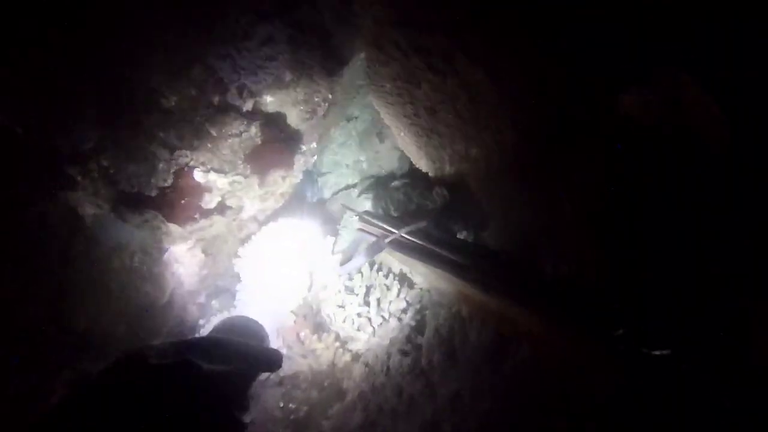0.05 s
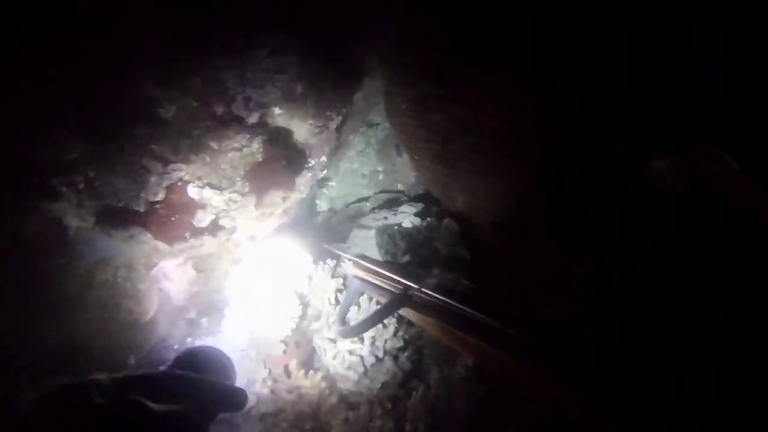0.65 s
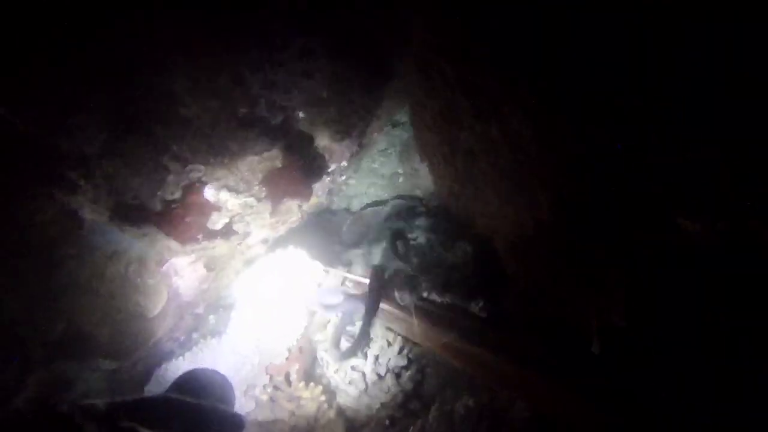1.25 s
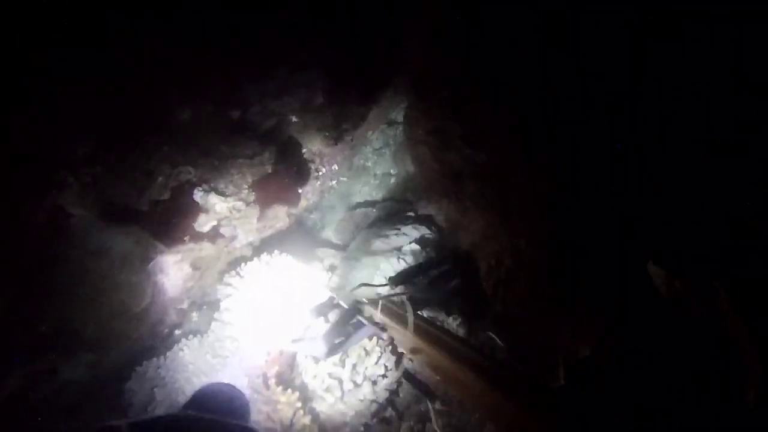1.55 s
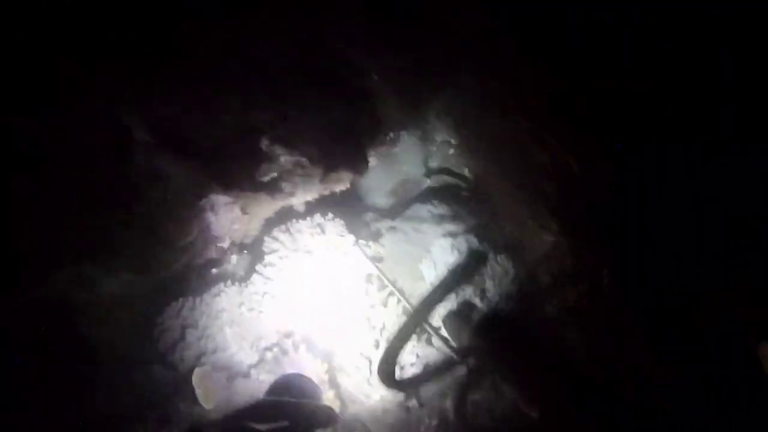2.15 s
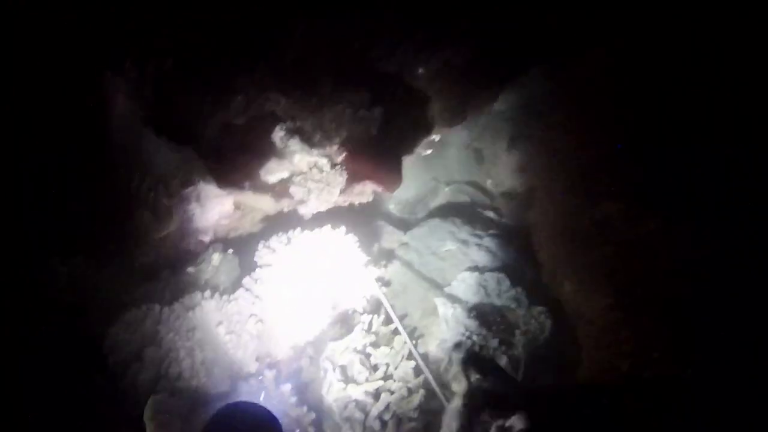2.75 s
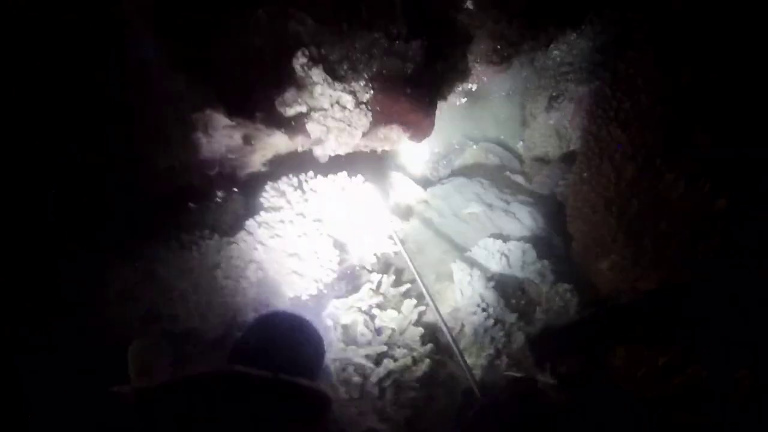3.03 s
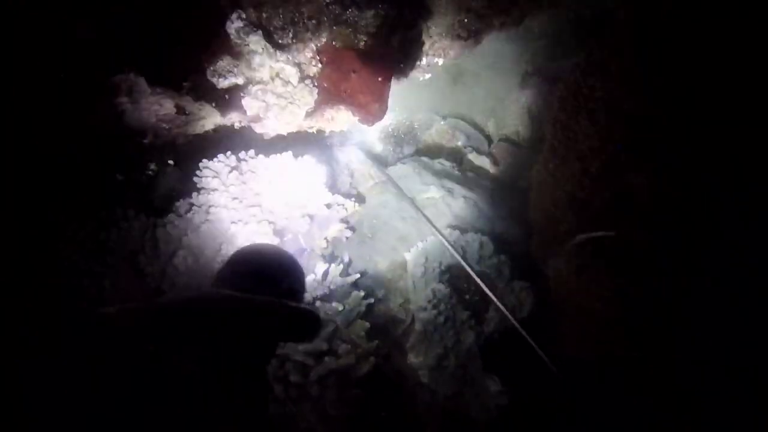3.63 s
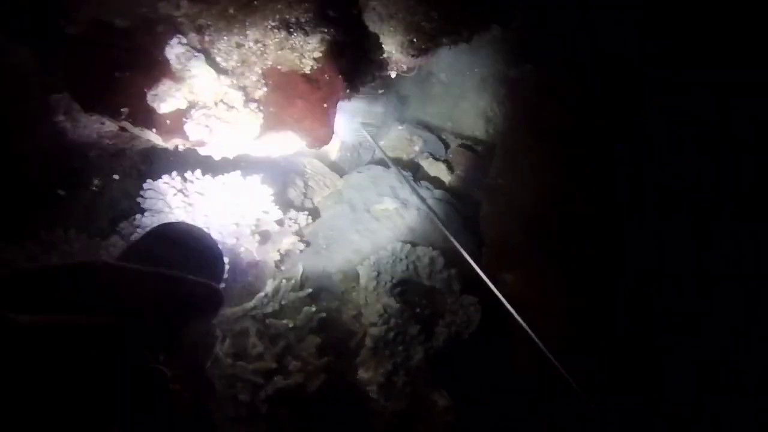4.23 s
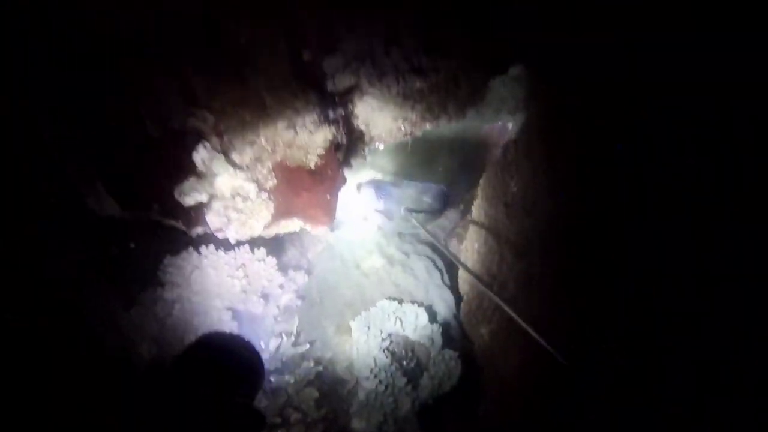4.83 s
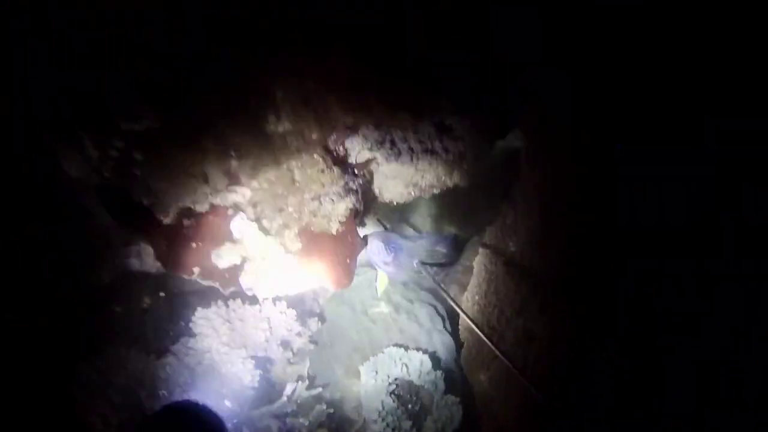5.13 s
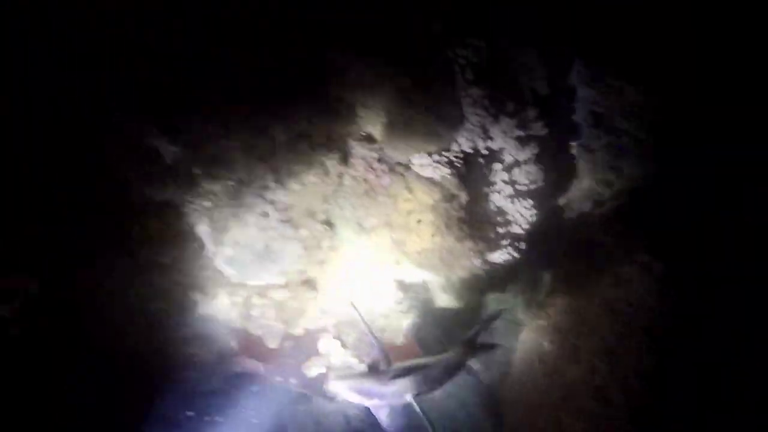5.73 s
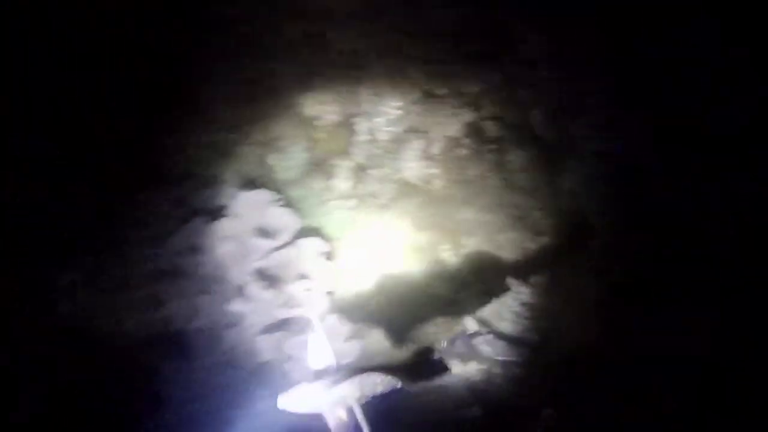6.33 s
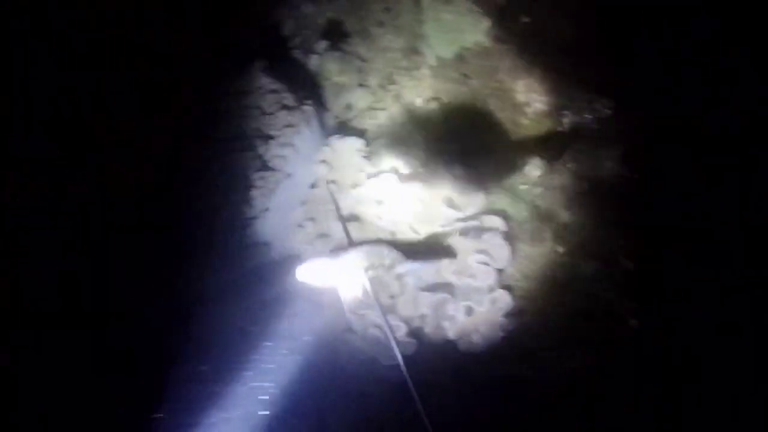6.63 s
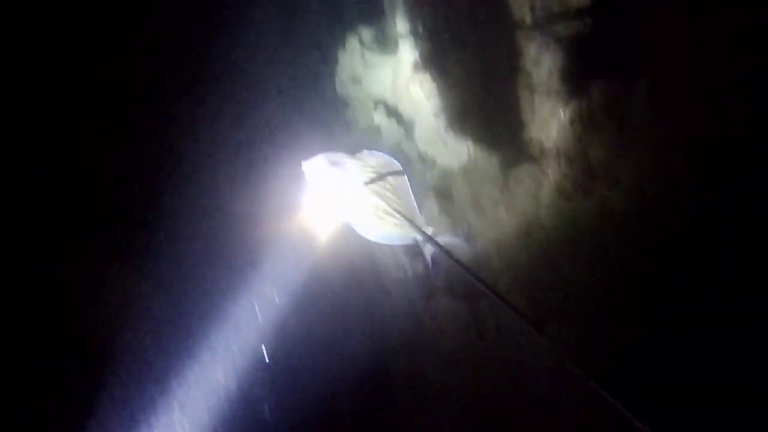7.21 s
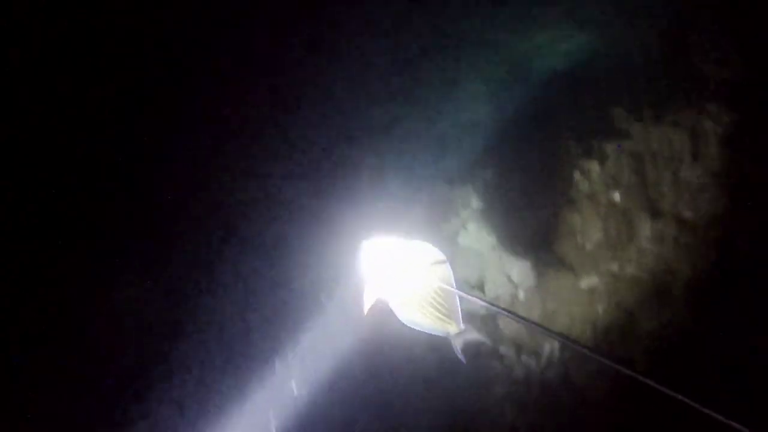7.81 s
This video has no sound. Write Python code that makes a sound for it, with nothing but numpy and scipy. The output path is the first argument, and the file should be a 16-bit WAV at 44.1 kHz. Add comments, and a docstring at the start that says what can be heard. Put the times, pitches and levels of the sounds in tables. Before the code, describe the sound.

A trigger clicks and a close speargun goes off with a sharp, slapping crack, followed by a short wooden-sounding rattle of line. Afterwards the water is much quieter, with soft low thumps from handling and a struggling fish, and occasional clacks of the shaft against coral. Faint shrimp snaps and a thin electrical buzz and hiss continue throughout, all heard from inside a hollow-ringing underwater camera case.

```python
"""Shrimp snap all around a reef at night, over the faint buzz and hiss of an underwater camera.
Close by, a band speargun fires: the rubbers slap, the shaft hits rock and the line rattles off.
Dull bumps, clacks and scrapes on coral follow as the fish is drawn in.
The microphone sits inside the camera's waterproof housing, which every sound in the water rings."""
import sys
import numpy as np
from scipy import signal
from scipy.fft import rfft, irfft
from scipy.io import wavfile

SR = 44100
rng = np.random.default_rng(int(sys.argv[2]) if len(sys.argv) > 2 else 0)


def store_wav(level_fs):
    """Save 16-bit WAV to argv[1]."""
    pcm = np.round(np.clip(np.atleast_2d(level_fs), -1, 1) * 32767)
    wavfile.write(sys.argv[1], SR, pcm.T.astype(np.int16))


N = 347067
TIME = np.arange(N) / SR
RING_TIME = TIME[:SR // 4]  # time axis of one impact [s]


def undb(db):
    """Decibels to gain."""
    return 10 ** (np.asarray(db) / 20)


def level(x, db):
    """Scale to an rms level."""
    return x * undb(db) / np.sqrt(np.mean(x ** 2))


def band(x, hz, octaves, order=2):
    """Band-pass around a centre frequency."""
    edges = [hz / 2 ** (octaves / 2), min(hz * 2 ** (octaves / 2), .48 * SR)]
    return signal.sosfilt(signal.butter(order, edges, "band", fs=SR, output="sos"), x)


def add(track, start_s, x):
    """Mix a sound in at a time."""
    i = int(start_s * SR)
    track[i:i + len(x)] += x[:N - i]


def through(x, response):
    """Pass a sound through an impulse response."""
    return signal.fftconvolve(x, response)[:len(x)]


def grains(per_s, spread_db):
    """Random clicks, most small and a few large."""
    size = undb(spread_db * np.minimum(rng.exponential(size=N), 4))
    return (rng.random(N) < per_s / SR) * size * rng.choice([-1, 1], N)


def wander(hz):
    """Smooth random drift around a given rate, with a spread of one."""
    return level(band(rng.standard_normal(N), hz, 2.9), 0)


def spell(start_s, length_s, attack_s, release_s):
    """Envelope that rises, holds and dies away."""
    t = TIME - start_s
    return np.clip(t / attack_s, 0, 1) * np.exp(-np.maximum(t - length_s, 0) / release_s)


def housing(echo_db=-14, echo_t60_s=.075):
    """Impulse response at the microphone: the case rings, and the reef scatters a short echo back."""
    # resonances of the case (frequency [Hz], t60 [s], gain at resonance [dB])
    modes = [(65.8, 0.062, -7.5), (118.7, 0.12, 7.5), (288, 0.068, -5.5), (376, 0.045, -5.5),
             (478.6, 0.05, 3), (523, 0.11, -4), (569, 0.059, -15.5), (680, 0.082, -16),
             (867.7, 0.035, -12.5), (1369.6, 0.033, -5), (1460, 0.028, -2), (1574, 0.048, -0.5),
             (1940, 0.022, -26.5), (2454, 0.045, -7), (3340, 0.0054, -16), (3950, 0.0058, -14),
             (4230, 0.0081, -12), (5320, 0.007, -4), (6160, 0.0046, -20.5), (7250, 0.003, -15.5),
             (8490, .004, -22), (9770, 0.013, -11), (13540, 0.0026, -28.5)]
    # pitches that its wall hardly passes (frequency [Hz], width [Hz])
    notches = [(1160, 220), (1850, 360), (2880, 290), (6700, 450), (11800, 1000)]
    ring = 0
    for hz, t60, db in modes:
        decay = np.log(1000) / t60
        envelope = undb(db) * decay / SR * np.exp(-decay * RING_TIME)
        ring = ring + envelope * np.cos(2 * np.pi * hz * RING_TIME)
    for hz, width in notches:
        ring = signal.lfilter(*signal.iirnotch(hz, hz / width, fs=SR), ring)
    echo = band(rng.standard_normal(len(RING_TIME)), 4300, 9.2)
    echo *= np.exp(-np.log(1000) * RING_TIME / echo_t60_s)
    echo *= undb(echo_db) / np.linalg.norm(echo)
    return ring + through(ring, echo)


def blow(case, peak_db, hz, octaves, grind_s, rough, order=2):
    """A push and a short grinding after it; the softer the contact, the lower the modes it reaches."""
    force = rng.standard_normal(len(RING_TIME)) * np.exp(-RING_TIME / grind_s)
    force *= rough / np.linalg.norm(force)
    force[0] += 1  # the clean push
    sound = through(band(force, hz, octaves, order), case)
    return sound * undb(peak_db) / np.abs(sound).max()


def camera(frame_hz=60, duty=.36, edge_hz=470, buzz_db=-71, hiss_db=-69, waver_db=6.5):
    """Beside the microphone, the sensor's current ticks on and off each frame, over hum, hiss and whine."""
    # hum of the electronics at the first multiples of the frame rate (mean level [dB])
    hum_levels = [-80, -75, -86.5, -88]
    # spectrum of the steady hiss (frequency [Hz], relative density [dB])
    hiss_curve = [(20, -9.5), (50, -5), (100, 5), (165, 6), (260, 0), (500, -5.5), (1000, -10.5),
                  (2000, -15.5), (3000, -21), (5400, -20.5), (8000, -25.5), (12500, -24.5), (16000, -28)]
    # thin whine of the electronics (frequency [Hz], width [Hz], level [dB])
    whine_bands = [(7066, 370, -87.5), (10840, 290, -87.5), (14500, 350, -95.5)]
    phase = (TIME * frame_hz - .2) % 1
    edges = -np.diff((phase < duty) * 1., prepend=0)
    buzz = signal.sosfilt(signal.butter(1, edge_hz, fs=SR, output="sos"), edges)
    buzz = signal.sosfilt(signal.butter(1, [90, 2100], "band", fs=SR, output="sos"), buzz)
    hum = -sum(level(np.cos(2 * np.pi * k * phase), db) for k, db in enumerate(hum_levels, 1))
    bin_hz = np.arange(1, N // 2 + 2) * SR / N
    curve_hz, curve_db = np.transpose(hiss_curve)
    hiss_gain = undb(np.interp(np.log(bin_hz), np.log(curve_hz), curve_db))
    hiss = irfft(rfft(rng.standard_normal(N)) * hiss_gain, N)
    whine = sum(level(band(rng.standard_normal(N), hz, np.log2(1 + width / hz), order=1), db)
                for hz, width, db in whine_bands)
    return level(buzz, buzz_db) + hum * undb(waver_db * wander(hz=10)) + level(hiss, hiss_db) + whine


def shrimp(case, knock_db=-9, cluster_db=1.7):
    """Close snaps each ping and knock on the case; farther off, the reef crackles in loose clusters."""
    # shrimp nearest the microphone (time [s], peak [dB], centre [Hz])
    snaps = [(0.6954, -45, 9500), (1.7956, -47, 8800), (1.8943, -46.5, 5450), (2.4963, -43.5, 9000),
             (3.1485, -52, 6440), (3.2302, -51.5, 4300), (3.33, -39, 10060), (5.0184, -47, 6250),
             (5.2307, -55, 4870), (6.6888, -43, 5470), (7.1715, -45, 5000), (7.2908, -43, 6740),
             (7.3486, -54, 4800), (7.4086, -50, 4930)]
    # distant shrimp, large to small (centre [Hz], snap rate [1/s], level [dB])
    reef = [(2000, 60, -87), (4100, 130, -83), (5500, 220, -79.5), (8050, 61, -87.5)]
    near, far = np.zeros(N), np.zeros(N)
    for s, db, hz in snaps:
        add(near, s, blow(case, db, hz, octaves=.64, grind_s=.00033, rough=2.6))
        add(near, s, blow(case, db + knock_db, hz=4250, octaves=.47, grind_s=.0017, rough=2.6, order=1))
    for hz, per_s, db in reef:
        crackle = band(grains(per_s, spread_db=5), hz, .77, order=1)
        far += level(through(crackle, case), db)
    return near + far * undb(cluster_db * wander(hz=2.5))


def bumps(case, vary_octaves=.06, rumble_db=-11, settle_s=.073):
    """Soft shoves, no two alike; the water churns briefly after each, and small jostles fill in."""
    # recoil, handling and the struggling fish (time [s], peak [dB])
    shoves = [(1.361, -28), (2.06, -45.5), (2.156, -45), (2.332, -45.5), (3.501, -43.5), (3.527, -42.5),
              (3.557, -48.5), (3.676, -44.5), (4.082, -37.5), (4.258, -41), (4.527, -47), (4.83, -35.5),
              (5.043, -36.5), (5.869, -42.5), (6.608, -47.5), (6.663, -37.5)]
    # spells of small jostling (start [s], length [s], level [dB])
    jostles = [(1.38, 0.62, -61.5), (2.19, 0.7, -70), (3.505, 0.12, -52), (4.097, 0.051, -52.5)]
    out = np.zeros(N)
    for s, db in shoves:
        hz = 110 * 2 ** (vary_octaves * rng.standard_normal())
        add(out, s, blow(case, db, hz, octaves=1.8, grind_s=.027, rough=.38, order=4))
        add(out, s, blow(case, db + rumble_db, hz=72.4, octaves=2.57, grind_s=settle_s, rough=7.3))
    effort = sum(undb(db) * spell(s, length, attack_s=.02, release_s=.023) for s, length, db in jostles)
    jostle = band(grains(per_s=130, spread_db=3), 135, .81, order=3)
    return out + effort * level(jostle, 0)


def line(case, start_s=1.36, length_s=.668, sag_db_per_s=9.5, rattle_db=-52, ticks_db=-76.5, rub_db=-75):
    """The line rattles off its pegs, fittings ticking, and rubs the stock; line and shaft knock low."""
    # low wooden-sounding knocks of the line and the shaft (time [s], peak [dB])
    knocks = [(.464, -53.5), (.576, -55.5), (1.424, -36), (1.473, -39), (1.545, -41.5), (1.581, -40),
              (1.628, -30.5), (1.695, -38), (1.749, -40.5), (1.779, -44), (1.826, -41), (1.891, -43.5),
              (1.916, -41.5), (1.950, -49), (1.981, -45), (2.002, -41.5), (2.112, -44), (2.322, -50.5),
              (5.039, -49), (6.06, -54), (6.215, -55.5), (7.133, -43.5)]
    out = np.zeros(N)
    for s, db in knocks:
        add(out, s, blow(case, db, hz=465, octaves=.87, grind_s=.0046, rough=.68, order=3))
    run = spell(start_s, length_s, attack_s=.0083, release_s=.069)
    run *= undb(-sag_db_per_s * np.maximum(TIME - start_s, 0))  # weaker as the shaft slows
    rattle = through(band(grains(per_s=260, spread_db=2.54), 480, .7, order=3), case)
    rub = through(band(grains(per_s=220, spread_db=2.5), 430, 1.3, order=4), case)
    ticks = through(band(grains(per_s=120, spread_db=2.5), 3300, 1.8), case)
    return out + run * (level(rattle, rattle_db) + level(ticks, ticks_db)) + level(rub, rub_db)


def shaft(case, hard_hz=3200, rub_db=3, hollow_db=-15):
    """Clacks ring the case hollowly, grinding more when harder; dragging adds a scrape and a low rub."""
    # the trigger clicks, the shaft hits gear and coral (time [s], peak [dB], centre [Hz])
    clacks = [(1.2545, -36.5, 2880), (1.629, -56.5, 2170), (1.891, -49, 1500), (1.982, -51, 1380),
              (4.7895, -33, 4670), (6.63, -52, 1800), (6.831, -47, 1525), (7.131, -44, 1240)]
    # the shaft drags over coral (start [s], length [s], level [dB])
    scrapes = [(1.735, 0.3, -75.5), (2.598, 0.044, -70.5), (3.291, 0.223, -73.5)]
    out = np.zeros(N)
    for s, db, hz in clacks:
        add(out, s, blow(case, db, hz, octaves=1.5, grind_s=.0031, rough=hz / hard_hz))
        add(out, s, blow(case, db + hollow_db, hz=1600, octaves=1.6, grind_s=.003, rough=.8))
    drag = sum(undb(db) * spell(s, length, attack_s=.024, release_s=.026) for s, length, db in scrapes)
    scrape = through(band(grains(per_s=140, spread_db=2.5), 1483, .22), case)
    rub = through(band(rng.standard_normal(N), 290, 1.9), case)
    return out + drag * (level(scrape, 0) + level(rub, rub_db))


def speargun(case, clack_db=-3, recoil_db=-13, slide_hz=4200, slide_s=.0068, slide_db=-17.5):
    """The shot, close up: metal grinds into each crack and kicks the gun; soft rubber pushes cleanly."""
    # the shaft leaves the catch, clears the muzzle and strikes rock (time [s], peak [dB])
    cracks = [(1.3023, -12.5), (1.3070, -22.5), (1.328, -27.5), (1.3416, -12), (1.3454, -18.5)]
    # the rubber bands slap the barrel and rebound (time [s], peak [dB])
    slaps = [(1.31, -14.5), (1.3300, -6), (1.3419, -2.5), (1.3483, -15), (1.3579, -18), (1.369, -27.5)]
    out, slide = np.zeros(N), np.zeros(N)
    for s, db in cracks:
        add(out, s, blow(case, db, hz=4890, octaves=2.5, grind_s=.0011, rough=1.8))
        add(out, s, blow(case, db + clack_db, hz=1650, octaves=1.6, grind_s=.0024, rough=.9))
        add(out, s, blow(case, db + recoil_db, hz=126, octaves=2, grind_s=.001, rough=.04))
        swell = np.sqrt(np.clip(1 + (TIME - s) / slide_s, 0, 1)) * (TIME < s)
        slide += undb(db + slide_db) * swell
    for s, db in slaps:
        add(out, s, blow(case, db, hz=443, octaves=1.4, grind_s=.00089, rough=.14))
    grind = band(rng.standard_normal(N), slide_hz, 3.4)
    return out + through(grind * slide, case) / np.std(through(grind, case))


def scene():
    """One microphone hears the hunt and the reef through the case, and the camera from within it."""
    case = housing()
    water = speargun(case) + shaft(case) + line(case) + bumps(case) + shrimp(case)
    return (water + camera())[None]


def record(dry, ceiling=.72, top_hz=15900):
    """The recorder rounds the peaks of the shot and cuts the highest treble."""
    rounded = ceiling * np.tanh(dry / ceiling)
    return signal.sosfilt(signal.ellip(10, .2, 80, top_hz, fs=SR, output="sos"), rounded)


dry = scene()
out = record(dry)
store_wav(out)
```